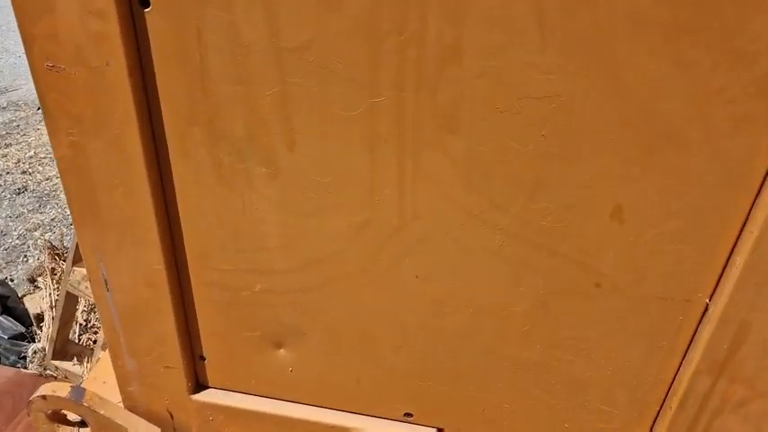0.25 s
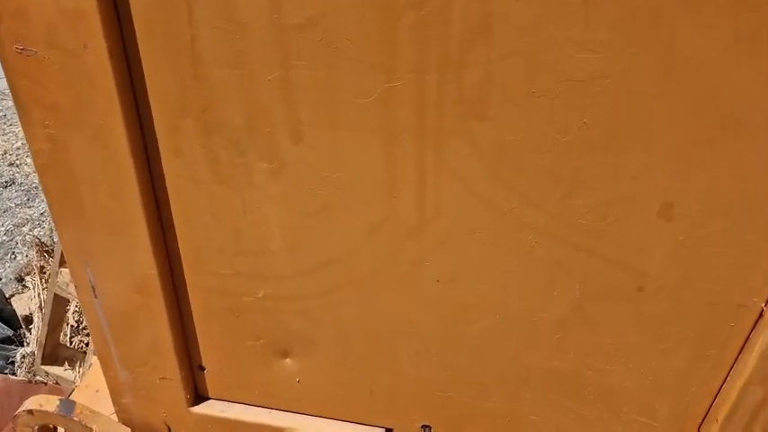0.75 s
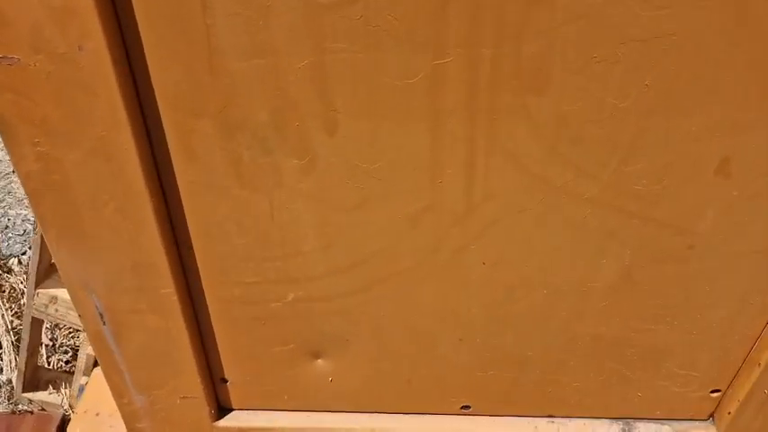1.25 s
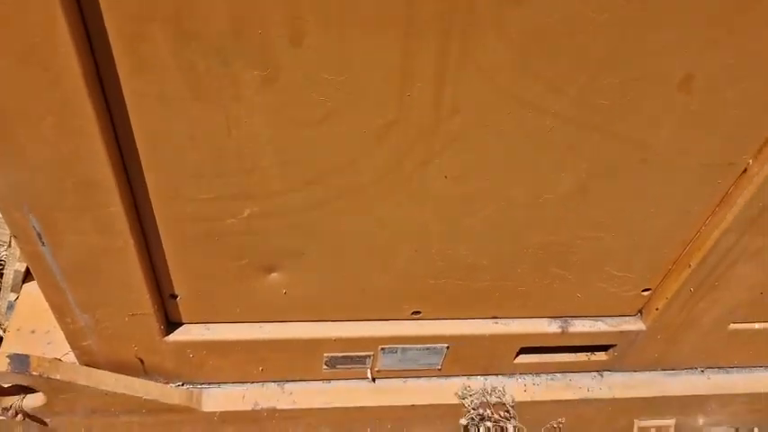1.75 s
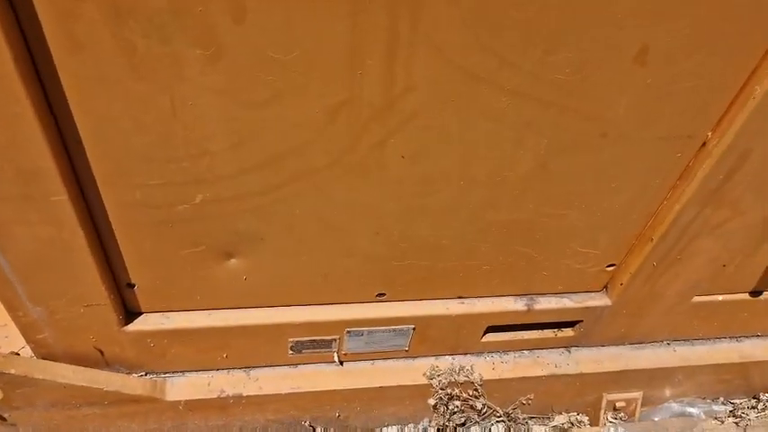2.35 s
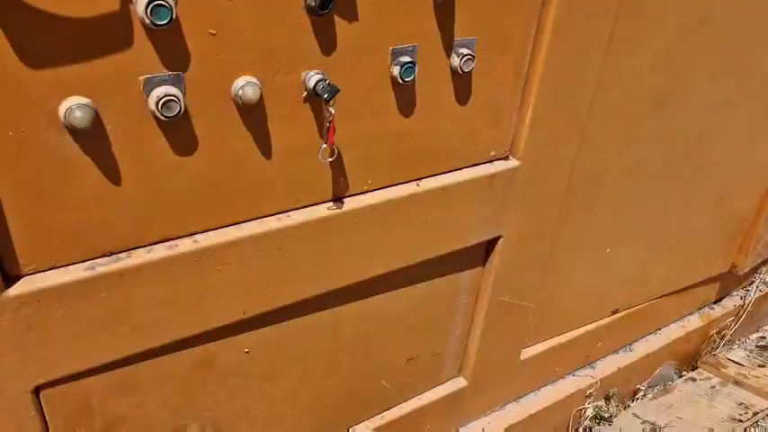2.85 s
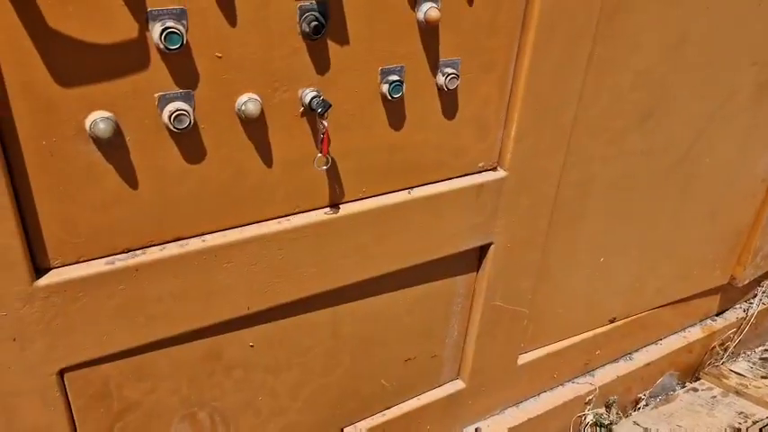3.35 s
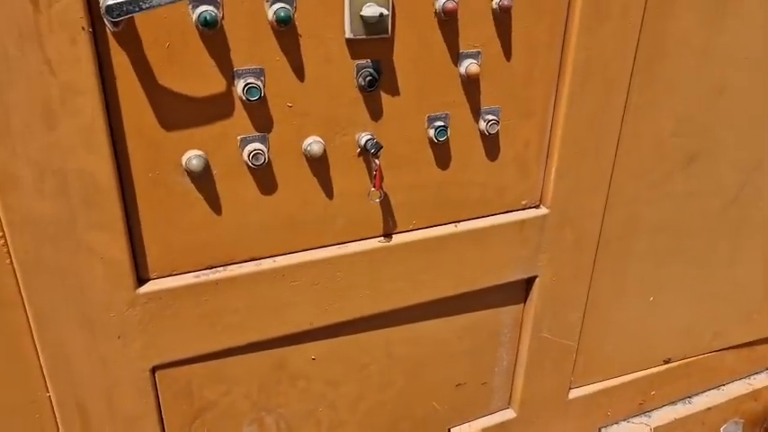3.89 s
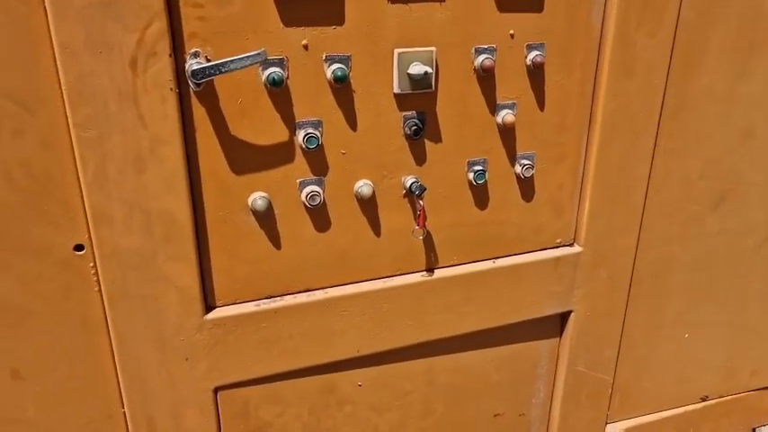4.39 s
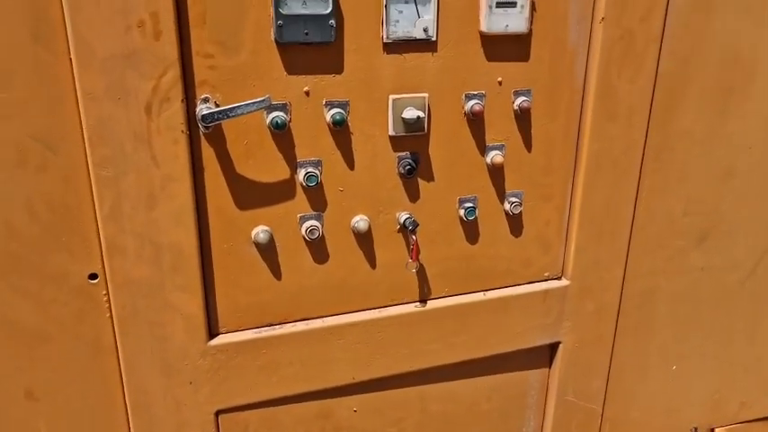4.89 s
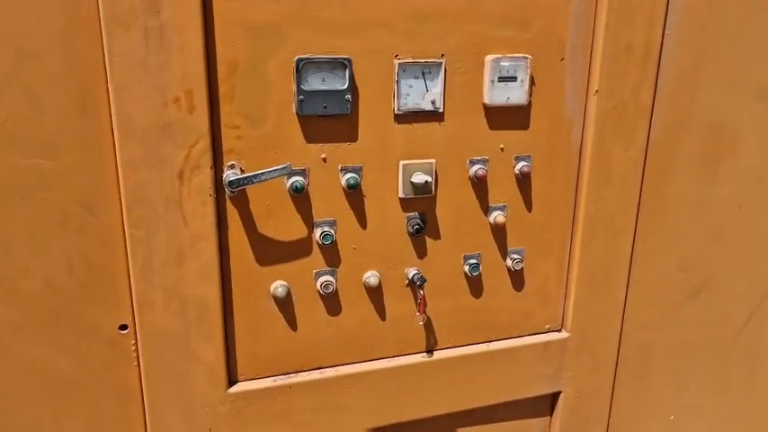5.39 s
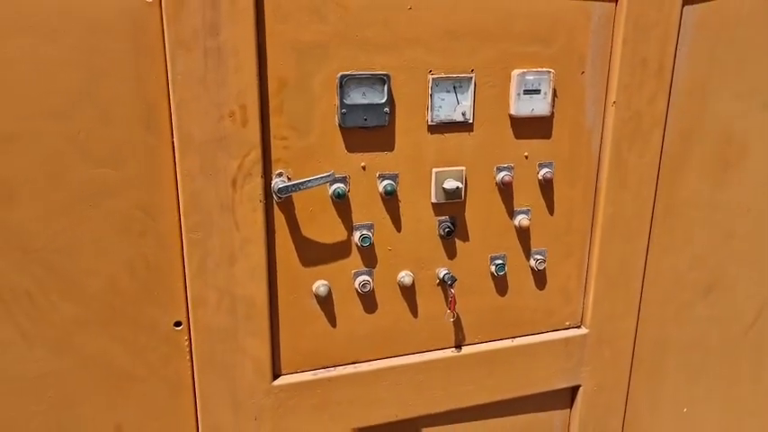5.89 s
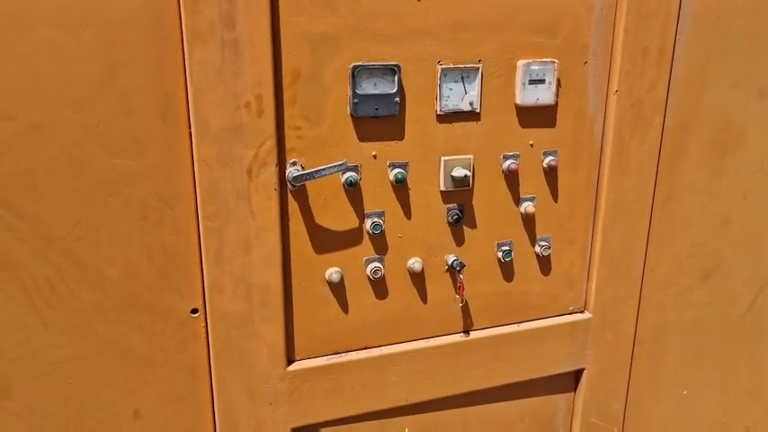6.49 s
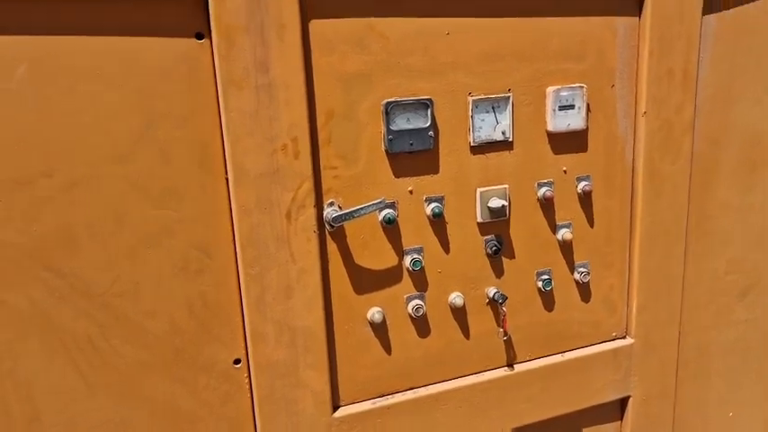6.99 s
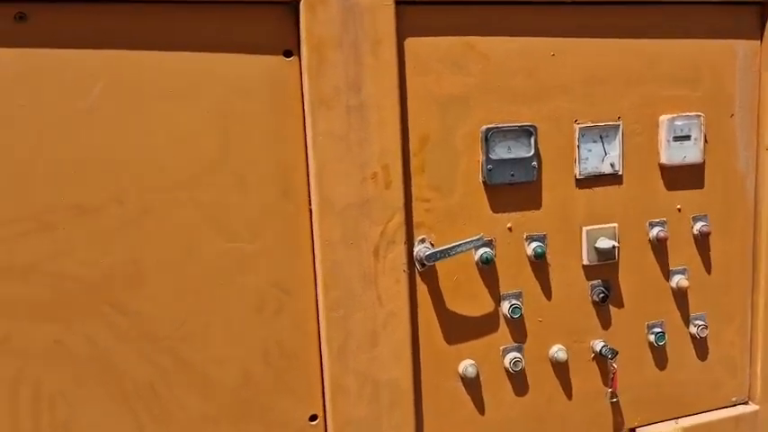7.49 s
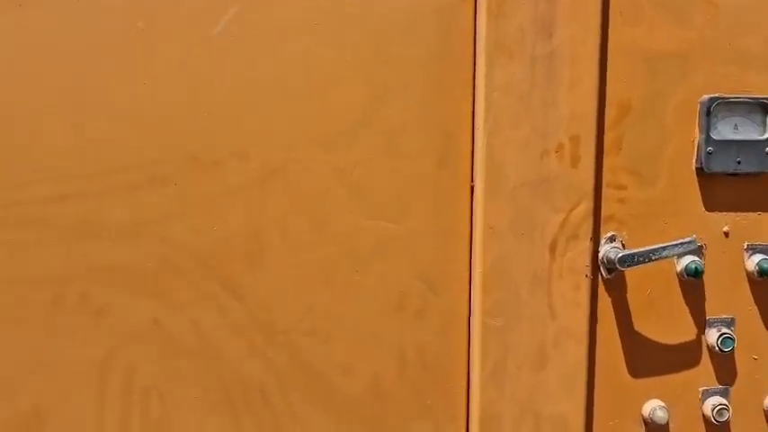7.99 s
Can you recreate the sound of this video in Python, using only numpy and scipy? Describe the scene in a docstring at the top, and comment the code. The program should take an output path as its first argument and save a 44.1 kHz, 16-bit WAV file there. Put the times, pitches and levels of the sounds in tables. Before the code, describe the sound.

Quiet street noise with a slowing engine and dry rustling, then a hard cut to a loud, steady diesel generator heard close to its steel housing.

```python
"""Outdoors, beside the steel housing of a generator. First a nearby engine slows down as two falling tones, over
street noise and faint hums, with dry rustling and a few clicks close by, all made from shaped noise and sines.
Then, after a cut, a six-cylinder diesel runs at a nearly steady speed: tones locked to the crank for the exhaust,
noise that partly repeats each cycle for clatter and hiss. The listener moves along the panels, so that the
exhaust tones and the clatter change in strength and colour."""
import sys
import numpy as np
from scipy import signal
from scipy.fft import rfft, irfft, next_fast_len
from scipy.io import wavfile
from scipy.ndimage import uniform_filter1d, map_coordinates

SR = 44100
rng = np.random.default_rng(int(sys.argv[2]) if len(sys.argv) > 2 else 0)


def invert_db(level):
    """Linear amplitude ratio for a level in decibels (20 dB per decade), elementwise."""
    return 10 ** (np.asarray(level, dtype=float) / 20)


def transcribe(u):
    """Save the signal u as a 16-bit wav file named by the first command-line argument.

    u: samples, shape (n,) or (channels, n), limited to [-1, 1]; the rate is SR.
    q: integer samples, one column per channel.
    """
    v = np.clip(np.atleast_2d(u).T, -1, 1)
    q = np.round(v * 32767).astype(np.int16)
    wavfile.write(sys.argv[1], SR, q)


N = 363825
TIME_S = np.arange(N) / SR
CUT_S = 2.919  # the diesel is heard from here

# Engine that slows down: t/s, firing tone f/Hz, level/dB
SLOWING_ENGINE = [(0.0, 43.6, -26), (0.292, 41.5, -25.5), (1.498, 23.39, -31.5), (1.85, 23.2, -45)]
# Street noise as the traffic moves off: t/s, level/dB
STREET_FADE = [(0.0, -39.5), (0.8, -39), (1.43, -43), (1.8, -42.5), (2.91, -44.5)]
# Colour of the low street rumble: f/Hz, relative level/dB
RUMBLE_COLOUR = [(11, -36), (18, -9), (43, -4.5), (70, -11), (102, -7), (233, -19), (283, -13.5),
                 (312, -18), (363, -19.5), (500, -20.5), (650, -34), (1100, -120)]
# Colour of the far traffic: f/Hz, relative level/dB
STREET_COLOUR = [(240, -40), (400, -17), (512, -7.5), (697, -0.5), (801, -5.5), (994, -3), (1290, -7),
                 (1710, -7), (3420, -20), (5430, -19), (9920, -34.5), (14600, -58), (16000, -49)]
# Faint far tones: f/Hz, usual level/dB, wander of the pitch/Hz
HUM_TONES = [(59, -36.5, 0.52), (102, -41, 2.15), (283.8, -43, 2.98)]
# Swells of rustling: t/s, length/s, crackle level/dB, scuff level over the crackle/dB
RUSTLE_SWELLS = [(0.025, 0.0092, -43, -8), (0.875, 0.018, -47, 3), (1.65, 0.028, -63, 19),
                 (1.705, 0.019, -59, 22), (1.787, 0.054, -62.5, 22.5), (2.24, 0.16, -57, 11),
                 (2.406, 0.065, -56, 15.5), (2.83, 0.039, -68, 18)]
# Colour of the dry crackle: f/Hz, relative level/dB
CRACKLE_COLOUR = [(3000, -33), (6000, -4.5), (9500, -6.5), (12000, -3.5), (16000, -11)]
# Colour of the duller scuff: f/Hz, relative level/dB
SCUFF_COLOUR = [(500, -17), (1000, 2), (1800, -1.5), (3500, -9), (7000, -13), (10000, -29)]
# Clicks: t/s, strength/dB, weight of the knock against the crack/dB, left over right/dB
CLICK_EVENTS = [(0.8638, -16, -27, -1.0), (1.4255, -31, 0, -19), (1.710, -23.5, 5.5, -31),
                (1.712, -29, 11, -17), (1.922, -19.5, -31, -12), (2.2334, -31.5, -16, 0.5),
                (2.415, -33, 3, -4), (2.663, -32.5, -19, -15), (2.8238, -35, 20.5, -34),
                (2.8313, -35, 7, -29), (8.0335, -16, -4, -29.5)]
# Low ringing of the clicked thing: f/Hz, width/Hz, level/dB
KNOCK_MODES = [(133, 82, 9), (477, 520, 1)]
# Its middle ringing: f/Hz, width/Hz, level/dB
TICK_MODES = [(1260, 850, 0)]
# Its treble ringing: f/Hz, width/Hz, level/dB
CRACK_MODES = [(3100, 1400, -7), (7240, 2600, -5), (12600, 1800, -6.5)]
# Diesel speed, one cycle being two turns of the crank: t/s, speed/(cycles per s)
CRANK_SPEED = [(2.92, 11.11), (4.7, 11.152), (5.75, 11.144), (7.25, 11.178), (8.25, 11.175)]
# The listener's way along the panels: t/s, extra path of the echo/m, exhaust nearness/dB,
# clatter level/dB, lag of the lowest firing tone/rad
LISTENER_WALK = [(2.92, 1.11, -4, -31.5, -.2), (4, 1.74, -3, -30, -.1), (5, 1.8, -2.5, -28.5, 0.2),
                 (6, 2.13, -2.5, -28, 1), (7, 2.07, -0.5, -28, 0.8), (7.6, 1.81, 1.5, -27.5, .05),
                 (8.25, 1.47, 1, -28, -.2)]
# Exhaust firing tones before nearness and echo: multiple of the cycle rate, level/dB
FIRING_TONES = [(6, -16), (12, -20.5), (18, -26.5), (24, -29.5), (30, -34.5)]
# Tones from unequal cylinders: multiple of the cycle rate, usual level/dB
UNEVEN_TONES = [(3, -36), (4, -38), (5, -40), (7, -30), (8, -34), (9, -36), (10, -30), (11, -40), (13, -39),
                (15, -40), (16, -36), (17, -41), (19, -37), (21, -42), (23, -38), (25, -43), (26, -38),
                (28, -43)]
# Colour of the clatter before the panels: f/Hz, relative level/dB
CLATTER_COLOUR = [(200, -9), (340, -6), (410, -13.5), (459, -8.5), (519, -13.5), (687, -11), (755, -13),
                  (821, -10), (1400, -10), (2580, -19), (3200, -21.5), (4160, -71), (7040, -120)]
# Valve puffs in the hiss: place/share of the cycle, usual starting level/dB, time to fall 60 dB/cycles
VALVE_PUFFS = [(0.132, -11.5, 0.73), (.28, -10.5, 1.1), (.44, -0.5, 4.7), (.74, -0.5, 1.74),
               (.94, -17, 1.5)]
# Colour of the hiss before the panels: f/Hz, relative level/dB
HISS_COLOUR = [(1410, -2), (2400, -3), (2600, -4), (3120, -4), (3400, -2), (4390, 0.5), (5020, -5.5),
               (5790, -9), (8550, -13), (9860, -17), (11200, -11.5), (14700, -16), (16000, -29)]
# Gear and pump tones before a shared boost and the panels: multiple of the cycle rate, level/dB
GEAR_TONES = [(54, -49.5), (60, -51.5), (63, -51), (75, -50), (87, -53), (112, -50.5), (130, -50),
              (156, -62), (220, -59)]
# Panel resonances met on the way: t/s, length/s, f/Hz, width/Hz, boost/dB
PANEL_RESONANCES = [(3.207, 0.29, 1730, 17, 13.5), (3.4, 0.28, 2166, 42, 5), (3.7, 0.92, 2530, 66, -13),
                    (3.75, 0.2, 1483, 16, 8), (4.203, 0.53, 473, 32, 2.5), (4.5, 0.77, 2100, 53, 3.5),
                    (4.644, 0.58, 4160, 260, 3.5), (5.3, 0.28, 1573, 33, 9), (5.4, 0.84, 1360, 22, 1),
                    (5.42, 0.09, 2453, 25, 15), (6.55, 0.33, 2360, 40, 7), (6.757, 0.45, 1232, 21, 9),
                    (7.1, 0.66, 4460, 160, 2), (7.35, 0.25, 1840, 24, 10.5), (7.6, 1, 2590, 240, -6.5)]
# Brackets rung by a tappet: t/s when strongest, length/s, f/Hz, level/dB
TAPPET_BRACKETS = [(4.2, 0.55, 3400, -52), (5.1, 0.37, 3200, -43), (6.3, 0.27, 3100, -46),
                   (4.6, 0.54, 2100, -47), (6.4, 0.44, 3630, -48)]
# Colour of the fan's roar: f/Hz, relative level/dB
ROAR_COLOUR = [(13, -41), (22, -10), (47, 5), (76, 2.5), (162, 7), (205, 7.5), (332, -6), (420, -5.5),
               (550, -56), (920, -120)]
# How alike left and right are, engine: f/Hz, likeness (1 = the same)
ENGINE_LIKENESS = [(60, .99), (200, .975), (550, .85), (1200, .7), (2200, .58), (5000, .3), (15000, .15)]
# How alike left and right are, street and rustling: f/Hz, likeness (1 = the same)
STREET_LIKENESS = [(60, 0.95), (200, 0.96), (550, 0.71), (1400, 0.35), (4000, 0.084), (15000, 0.064)]
# Difference in colour between the two channels: f/Hz, left over right/dB
LEFT_OVER_RIGHT = [(60, 1), (130, -0.5), (290, 0.5), (640, 0.5), (1410, -1.5), (3100, -2), (6820, -1),
                   (15000, 5)]


def unit(x):
    """Scales a sound to an average (rms) strength of 1."""
    return x / np.sqrt(np.mean(x ** 2) + 1e-20)


def along(points, hz):
    """Reads a curve of (Hz, value) points, with pitch on a log scale."""
    f, v = np.transpose(points)
    return np.interp(np.log(hz + 1), np.log(f + 1), v)


def curves(rows):
    """Gives one value per sample for each column after the time."""
    s, *columns = np.transpose(rows)
    return [np.interp(TIME_S, s, column) for column in columns]


def wobble(rate):
    """A smooth random curve that passes through `rate` random points a second."""
    points = rng.standard_normal(int(N * rate / SR) + 4)
    return map_coordinates(points, [np.arange(N) * rate / SR])


def noise():
    """Two unrelated white noises."""
    return rng.standard_normal((2, N))


def filtered(x, response):
    """Multiplies the spectrum of x by a response that depends on frequency."""
    m = next_fast_len(N + SR // 4)
    return irfft(rfft(x, m) * response(np.fft.rfftfreq(m, 1 / SR)), m)[..., :N]


def resonances(modes):
    """Ringing of (Hz, width, dB) modes that starts when struck; neighbours have opposite signs."""
    def mode(f, centre, width):
        return 1j * f * width / (centre * centre - f * f + 1j * f * width)

    return lambda f: sum((-1) ** k * invert_db(db) * mode(f, centre, width)
                         for k, (centre, width, db) in enumerate(modes))


def spread(pair, colour, likeness, lag_ms):
    """Colours two unrelated signals and mixes them to stereo with a middle of rms 1; left lags by lag_ms."""
    def share(hz):
        turn = np.arccos(np.clip(along(likeness, hz), -1, 1)) / 2
        return invert_db(along(colour, hz)) * [np.cos(turn), np.sin(turn)]

    mid, side = filtered(pair, share)
    both = np.array([mid + side, mid - side]) / np.sqrt(np.mean(mid ** 2) + 1e-20)
    halves = np.array([[1], [-1]])
    return filtered(both, lambda hz: np.exp(-1j * np.pi * hz * lag_ms / 1000 * halves))


def slowing():
    """An engine that runs down: its firing tone and one half as high again fall together."""
    hz, db = curves(SLOWING_ENGINE)
    turn = 2 * np.pi * np.cumsum(hz) / SR
    fade = np.clip((1.9 - TIME_S) / 0.08, 0, 1)
    # the upper tone starts 19 dB below the firing tone and gains 13 dB a second as the speed drops
    upper = invert_db(-19 + 13 * TIME_S) * np.sin(3 / 2 * turn)
    return np.sqrt(2) * fade * invert_db(db) * (np.sin(turn) + upper)


def street():
    """Lumpy rumble and far traffic, both coloured noise, with faint tones that wander in pitch."""
    street_db, = curves(STREET_FADE)
    start_db = STREET_FADE[0][1]
    # the rumble starts 13 dB over the street and swings 1.72 times as widely
    rumble_db = start_db + 13 + 1.72 * (street_db - start_db)
    lumps = invert_db(1.6 * wobble(12))
    rumble = invert_db(rumble_db) * lumps * spread(noise(), RUMBLE_COLOUR, STREET_LIKENESS, lag_ms=0.074)
    far_level = invert_db(street_db + 1.3 * wobble(7.18))
    far = far_level * spread(noise(), STREET_COLOUR, STREET_LIKENESS, lag_ms=0.34)

    # the top hum tone fades by 9 dB a second after the traffic has gone
    fade_db = 9 * np.clip(TIME_S - STREET_FADE[2][0], 0, None)
    hum = 0
    for hz, db, wander_hz in HUM_TONES:
        level = invert_db(db - fade_db * (hz > 200) + 1.8 * wobble(4.57))
        hum = hum + level * np.sin(2 * np.pi * np.cumsum(hz + wander_hz * wobble(2.56)) / SR)
    return rumble + far + hum


def rustle():
    """Dry crackle over a duller scuff: swells of noise with small snaps that start sharply and die fast."""
    swells = np.array([invert_db(db) / (1 + (2 * (TIME_S - s) / length) ** 4)
                       for s, length, db, _ in RUSTLE_SWELLS])
    snaps = (rng.random(N) < 90 / SR) * rng.exponential(size=N)  # about 90 a second
    snap_decay = invert_db(-60 * TIME_S[:SR // 20] / 0.036)  # falls 60 dB in 0.036 s
    grain = 1 + signal.fftconvolve(snaps, snap_decay)[:N]
    bed = invert_db(-57 - 6.5 * TIME_S)  # steady crackle that dies away by 6.5 dB a second
    crackle_level = swells.sum(axis=0) + bed
    crackle = crackle_level * spread(grain * noise(), CRACKLE_COLOUR, STREET_LIKENESS, lag_ms=0.216)
    scuff_level = invert_db(np.transpose(RUSTLE_SWELLS)[3]) @ swells
    scuff = scuff_level * spread(grain * noise(), SCUFF_COLOUR, STREET_LIKENESS, lag_ms=0.21)
    return crackle + scuff


def clicks():
    """Each click is a short crack in the treble, a ringing tick below it and a knock in the body."""
    crack, tick, knock = np.zeros((3, 2, N + SR))
    t = np.arange(SR // 10) / SR
    # a fast crack (60 dB in 0.0087 s), then weaker grit (60 dB in 0.17 s)
    decay = invert_db(-60 * t / 0.0087) + invert_db(-20 - 60 * t / 0.17)
    for s, db, weight_db, pan_db in CLICK_EVENTS:
        start = round(s * SR)
        sides = invert_db([pan_db / 2, -pan_db / 2])
        burst = invert_db(db) * decay * rng.standard_normal(len(t))
        crack[:, start:start + len(t)] += np.outer(sides, burst)
        # heavier clicks tick louder, up to a weight of 10 dB
        tick[:, start] = invert_db(db + 0.34 * min(weight_db, 10) + 25.5) * sides
        knock[:, start] = invert_db(db + weight_db + 29) * np.sqrt(sides)  # the knock leans half as far

    def soft_knock(hz):
        ringing = sum(resonances([mode])(hz) for mode in KNOCK_MODES)
        return ringing / (1 + 1j * hz / 1600) ** 2  # a soft contact gives little treble

    cracks = filtered(crack, resonances(CRACK_MODES))
    ticks = filtered(tick, lambda hz: resonances(TICK_MODES)(hz) ** 2)
    return cracks + ticks + filtered(knock, soft_knock)


def crank():
    """Counts engine cycles gone by, set to a third of a cycle or so at the cut."""
    cycles = np.cumsum(curves(CRANK_SPEED)[0]) / SR
    return cycles - cycles[round(CUT_S * SR)] + 0.33


def exhaust(cycles):
    """Crank-locked tones; an echo with a longer path strengthens or weakens each firing tone."""
    path_m, near_db, _, lag = curves(LISTENER_WALK)
    echo_cycles = curves(CRANK_SPEED)[0] * path_m / 343  # sound travels 343 m a second
    apart = np.outer([1, -1], 0.061 + 0.062 * wobble(1.0))  # left and right phases differ a little

    def tone(k, lead):
        # the .042 term lets the higher tones out of the silencer ahead of the bass
        return np.sqrt(2) * np.cos(k * (2 * np.pi * cycles + 0.4 + 0.042 * k) - 3.6 + lead)

    firing = 0
    for k, db in FIRING_TONES:
        k = round(k)
        lead = -lag * (k == 6) - 0.0036 * k * (k - 6) + np.pi * (k == 30)  # the top tone is turned over
        lead = lead + apart * (0.3 + (k / 24) ** 2)
        echo = np.abs(1 + 0.59 * np.exp(-2j * np.pi * k * echo_cycles))
        level = invert_db(db + near_db * 6 / k + 0.5 * wobble(6))  # nearness counts most in the bass
        firing = firing + level * echo * tone(k, lead)

    # weak cylinders leave gaps, so most in-between tones above the firing tone stand against the beat
    uneven = 0
    for k, db in UNEVEN_TONES:
        k = round(k)
        lead = np.pi * (k > 6 and k % 6 > 1) - 0.8 * (k % 6 == 1) - 1.9 * (k > 6 and k % 6 == 4)
        uneven = uneven + invert_db(db + 2.7 * wobble(1.52)) * tone(k, lead)
    return firing + uneven


def repeating(cycles, count, size, drift):
    """Knocks that come back every cycle; `count` noise patterns fade into each other."""
    blows = np.repeat(rng.standard_normal((count, size // 60)), 60, axis=1)  # strong and weak stretches
    knocks = rng.standard_normal((2, count, size)) * invert_db(2.5 * blows)
    place = (cycles % 1 * size).astype(int)
    weights = np.array([wobble(drift) for _ in range(count)])
    weights = weights / np.linalg.norm(weights, axis=0)
    return unit(np.sum(knocks[:, :, place] * weights, axis=1))


def rattle(cycles, share, thrice):
    """Noise of which one share repeats from cycle to cycle and another three times a cycle."""
    once = repeating(cycles, count=4, size=3960, drift=0.9)
    often = repeating(3 * cycles, count=4, size=1320, drift=0.9)
    return np.sqrt(share) * once + np.sqrt(thrice) * often + np.sqrt(1 - share - thrice) * noise()


def clatter(cycles):
    """Pistons and valves rattle the block: coloured noise, partly alike in every cycle."""
    blows = rattle(cycles, share=0.45, thrice=0.18)
    level = invert_db(curves(LISTENER_WALK)[2])
    return level * spread(blows, CLATTER_COLOUR, ENGINE_LIKENESS, lag_ms=0.098)


def hiss(cycles):
    """Air and valve hiss: steady flow plus puffs at set crank angles, each puff varying in strength."""
    puffs = 0.5  # the steady flow
    for at, db, t60 in VALVE_PUFFS:
        puffs = puffs + invert_db(db + 1.3 * wobble(11) - 60 * ((cycles - at) % 1) / t60)
    puffs = uniform_filter1d(puffs, size=180)  # soft starts
    puffs = puffs * (1 + 0.11 * np.cos(12 * np.pi * cycles))  # a throb at each firing
    air = rattle(cycles, share=0.17, thrice=0.03)
    level = invert_db(curves(LISTENER_WALK)[2] - 6.5)  # 6.5 dB below the clatter
    return level * spread(puffs * air, HISS_COLOUR, ENGINE_LIKENESS, lag_ms=0.12)


def gears(cycles):
    """Gears and pumps: tones locked to the shaft that flutter in strength and phase."""
    total = 0
    for k, db in GEAR_TONES:
        level = invert_db(db + 3.0 + 2.3 * wobble(2.5) + 2.5 * wobble(15))
        total = total + level * np.sin(2 * np.pi * round(k) * cycles + 0.66 * wobble(9))
    return total


def bump(v, centre, width):
    """A smooth bell-shaped hump of height 1."""
    return np.exp(-((v - centre) / width) ** 2 / 2)


def panels(x):
    """Steel panels colour the rattle: one resonance slides down as the listener backs off, others come and go."""
    hz, t, z = signal.stft(x, SR, nperseg=2048, noverlap=1536)
    # the sliding resonance starts at 1627 Hz at the cut and falls 71 Hz a second
    away_hz = hz[:, None] - 1627 + 71 * (t - CUT_S)
    slide_db = 3.5 * bump(away_hz, 0, 62) - 3 * bump(np.abs(away_hz), 380, 84)  # quiet valleys on both sides
    gain_db = slide_db * np.clip((6.93 - t) / 0.8 + 1, 0, 1)  # fades out over 0.8 s from 6.93 s
    for s, length, centre, width, db in PANEL_RESONANCES:
        gain_db += db * np.outer(bump(hz, centre, width), bump(t, s, length))
    # the many small modes: narrow in pitch, most of a second long
    small = uniform_filter1d(rng.standard_normal(gain_db.shape), size=2, axis=0)
    small = uniform_filter1d(small, size=60, axis=1)
    depth_db = along([(1500, 2.3), (3500, 1.7)], hz)[:, None]
    z = z * invert_db(gain_db + depth_db * unit(small))
    return signal.istft(z, SR, nperseg=2048, noverlap=1536)[1][:, :N]


def fan_roar():
    """The fan's low roar: steady coloured noise."""
    return invert_db(-28) * spread(noise(), ROAR_COLOUR, ENGINE_LIKENESS, lag_ms=0)


def tappet(cycles):
    """A tappet rings brackets twice a cycle: dying beats of varying strength on slightly unsteady tones."""
    speed = curves(CRANK_SPEED)[0]
    beats = 0
    for at in (0.24, 0.83):  # shares of the cycle
        since_s = ((cycles - at) % 1) / speed
        beats = beats + invert_db(2.5 * wobble(11) - 60 * since_s / 0.07)  # falls 60 dB in 0.07 s
    unsteady = 1.2 * np.array([wobble(60), wobble(60)])
    ringing = sum(invert_db(db) * bump(TIME_S, s, length) * np.sin(2 * np.pi * hz * TIME_S + unsteady)
                  for s, length, hz, db in TAPPET_BRACKETS)
    return np.sqrt(2) * unit(beats) * ringing


def diesel():
    """All engine sounds share one crank; clatter, hiss and gears pass through the panels."""
    cycles = crank()
    through_panels = panels(clatter(cycles) + hiss(cycles) + gears(cycles))
    return exhaust(cycles) + through_panels + fan_roar() + tappet(cycles)


def scene():
    """The street until the cut, the diesel after it, and clicks in both."""
    after = np.clip((TIME_S - CUT_S) / 0.0015, 0, 1)
    before_cut = slowing() + street() + rustle()
    return (1 - after) * before_cut + after * diesel() + clicks()


def band_limit(x):
    """A steep low-pass at the top of the band."""
    return signal.sosfilt(signal.butter(12, 16680, fs=SR, output="sos"), x)


def record(dry):
    """Gives the left and right channels slightly different colours."""
    halves = [[0.5], [-0.5]]
    mix = filtered(dry, lambda hz: invert_db(along(LEFT_OVER_RIGHT, hz) * halves))
    return band_limit(mix)


dry = scene()
out = record(dry)
transcribe(out)
```